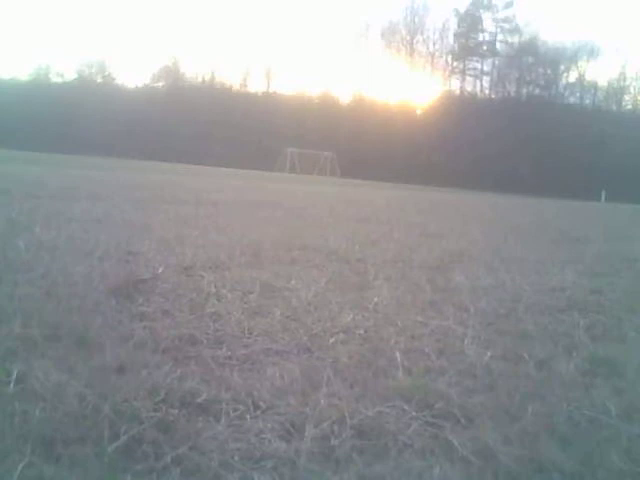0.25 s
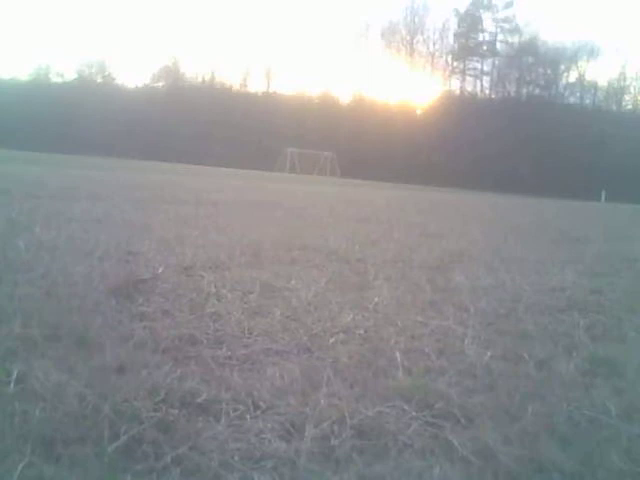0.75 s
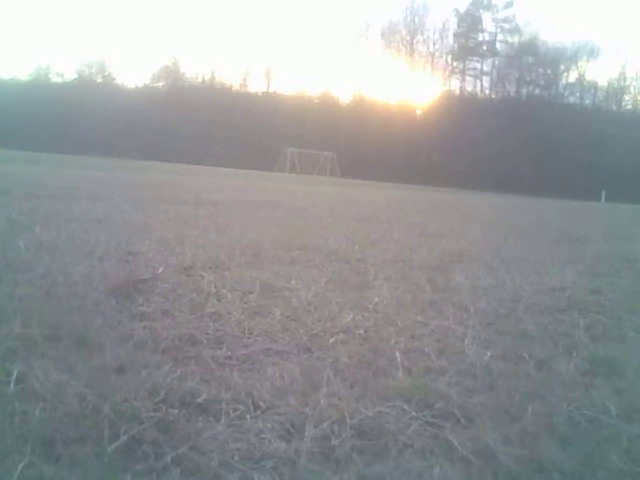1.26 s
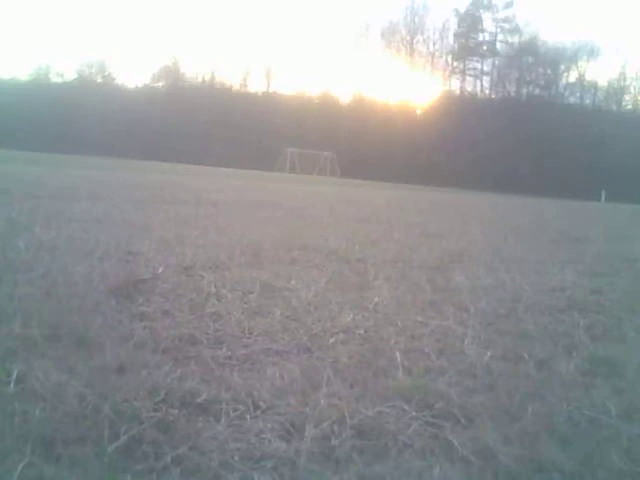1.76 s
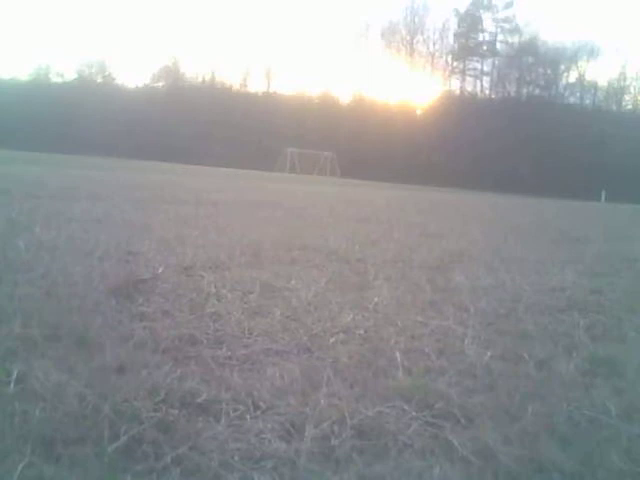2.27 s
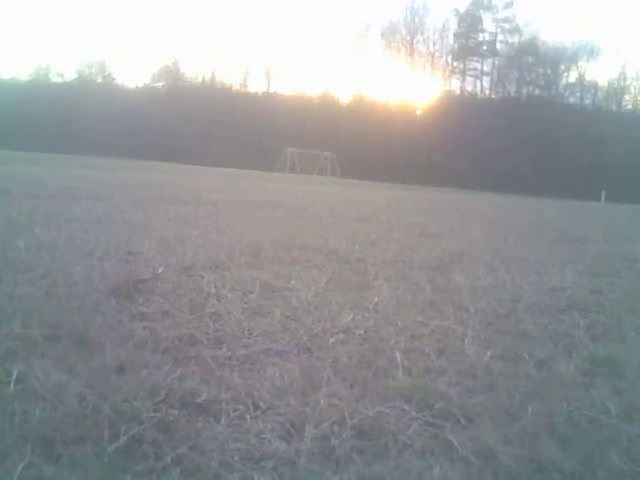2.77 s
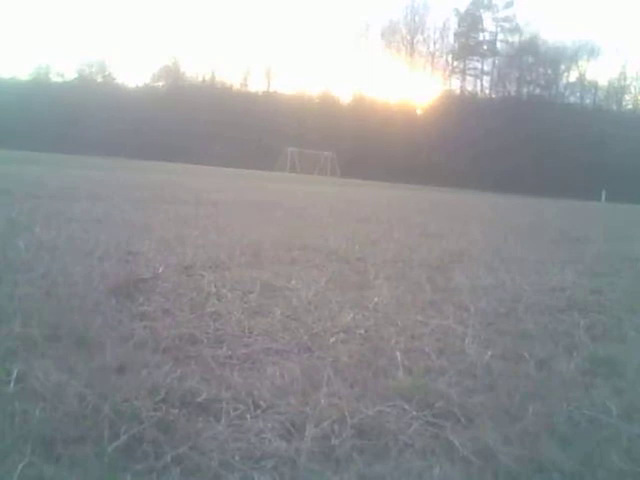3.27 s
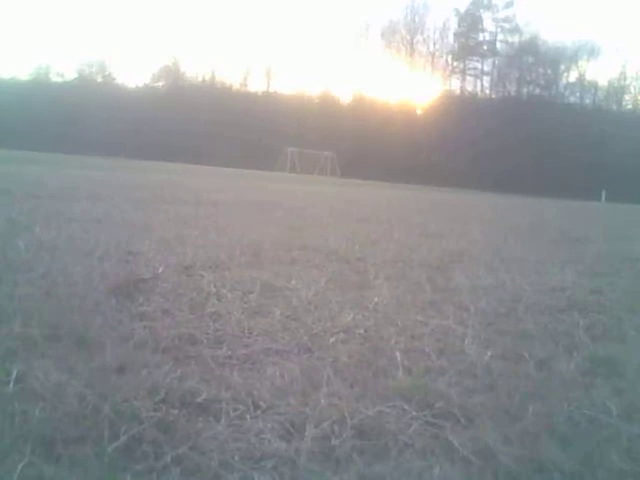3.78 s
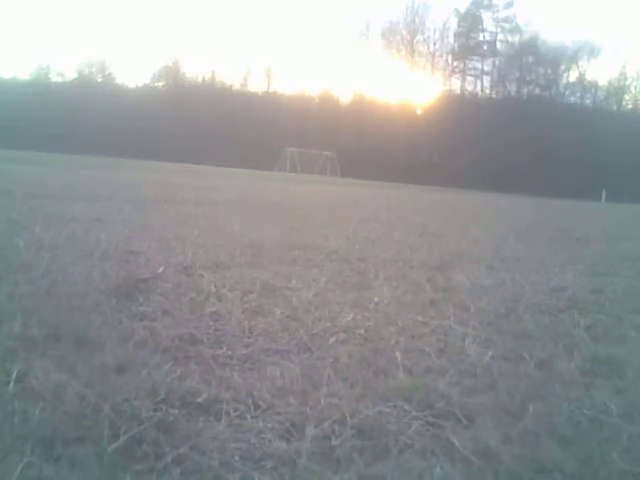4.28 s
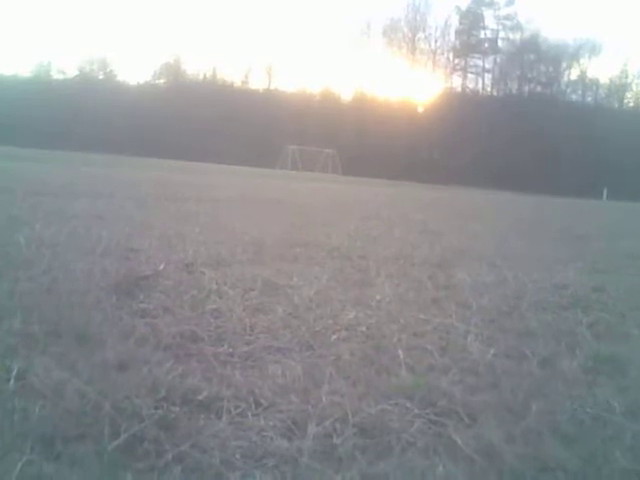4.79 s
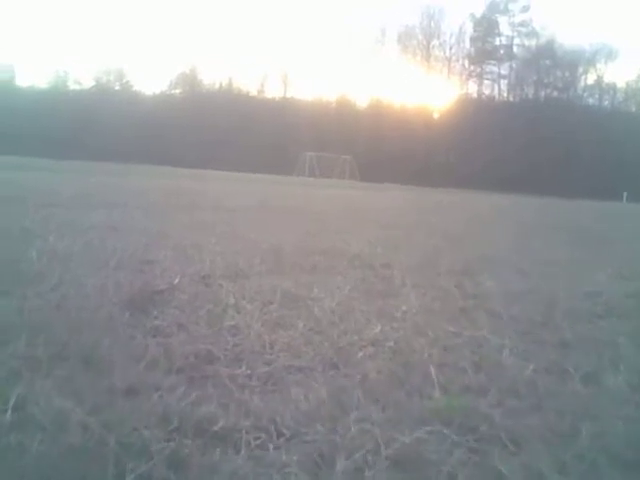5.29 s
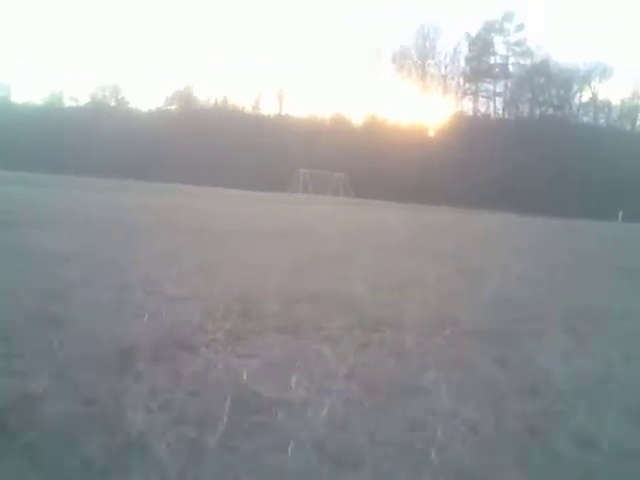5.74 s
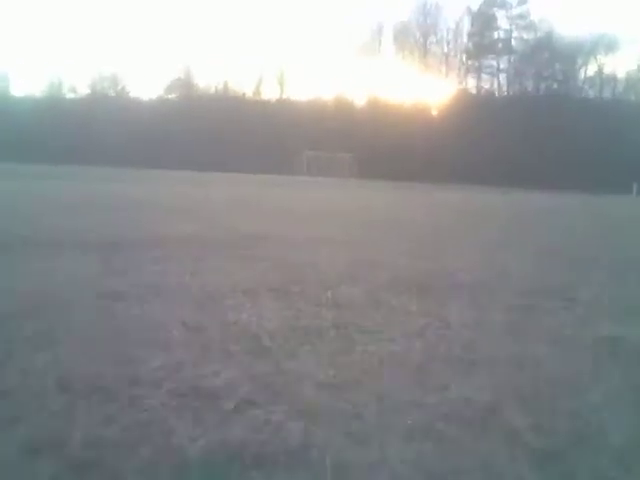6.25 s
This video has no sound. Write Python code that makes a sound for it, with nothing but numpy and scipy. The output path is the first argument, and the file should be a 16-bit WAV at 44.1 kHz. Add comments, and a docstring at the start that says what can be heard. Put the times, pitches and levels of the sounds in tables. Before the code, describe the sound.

Close on the frame of a model aircraft standing in an open grassy field, two electric motors idle quietly at slightly different speeds, beating in a low drone with fine servo ticking and brief gear rasps. After three seconds they throttle up in uneven surges, then climb to a loud, clipped, rasping roar. Wheels knock over tufts and stalks swish as it rolls until the end. No room echo.

```python
"""On the frame of a twin-motor electric model aircraft making a take-off run through grass.
Two motors idle at different speeds, heard as sum and difference tones, while servos tick and rasp.
They spool up: shaft hum, blade tone and filtered-noise air rush swell; wheel knocks ring the frame, stalks swish.
The shaking overloads the microphone, which clips it into a lopsided, rasping square wave."""
import sys
import numpy as np
from scipy import signal
from scipy.fft import rfft, irfft
from scipy.io import wavfile
from scipy.ndimage import uniform_filter1d

SR = 44100
rng = np.random.default_rng(int(sys.argv[2]) if len(sys.argv) > 2 else 0)


def dump_mix(stems):
    """Bounce the given channels to the path in sys.argv[1] as a 16-bit WAV at rate SR."""
    frames = np.atleast_2d(stems).T  # one column per channel
    limited = np.clip(frames, -1, 1)  # hard clip at full scale
    pcm = np.round(limited * 32767).astype(np.int16)
    wavfile.write(sys.argv[1], SR, pcm)


N = 287532
T = np.arange(N) / SR  # s

# lead motor: time_s, shaft_hz
SPEED_CURVE = [(3.08, 135.2), (3.16, 149.3), (3.3, 165.7), (3.5, 183.2), (3.6, 176.4), (3.77, 185.7),
               (3.92, 178.3), (4.02, 182.9), (4.2, 184), (4.4, 193.6), (4.71, 244.5), (4.86, 251.3),
               (4.98, 275.6), (5.12, 296.7), (5.26, 300.5), (5.41, 320.5), (5.5, 322), (5.6, 351.5),
               (5.95, 365.3)]
# shaft unbalance shaking the mount: shaft_hz, level_db
HUM_BY_SPEED = [(135, -55), (150, -26), (182, -24.5), (188, -6.5), (195, -1), (228, 9.5), (290, 3),
                (356, 4), (366, -10)]
# blade tone strength: shaft_hz, level_db
BLADE_BY_SPEED = [(135, -48), (143, -16.5), (160, -2.5), (215, 2.5), (238, -10.5), (272, 0), (322, -1.5),
                  (352, -4.5), (366, -26)]
# hum swells: start_s, end_s, rise_db
HUM_SWELL_EVENTS = [(3.24, 3.41, 11), (3.47, 3.6, 14), (3.77, 3.94, 14)]
# brief blade tone dips: start_s, end_s, change_db
BLADE_DIP_EVENTS = [(3.425, 3.45, -8.5), (3.565, 3.595, -18), (3.9, 3.93, -17), (4.48, 4.515, -6.5),
                    (4.595, 4.69, -30), (5.045, 5.075, -15), (5.56, 5.6, -22)]
# gusts of rough air: start_s, end_s, rise_db over the steady rush
GUST_EVENTS = [(3.175, 3.235, 14), (3.28, 3.355, 10.5), (3.425, 3.51, 11.5), (3.61, 3.79, 9.5),
               (3.95, 4.475, 10), (5.04, 5.13, 5), (5.22, 5.33, 3.5)]
# airframe response to air rush and overtones: freq_hz, gain_db
FRAME_RESPONSE = [(40, -37.5), (170, -24), (235, -3), (350, 7), (420, 5), (480, -9.5), (640, -3.5),
                  (780, -9), (900, -4.5), (1030, -15.5), (1210, -5.5), (1550, -15), (2200, -16),
                  (3200, -29.5), (6000, -37.5), (11500, -47)]
# loaded overtones, before frame colour: lead_multiple, slow_multiple, level_db
LOAD_OVERTONES = [(0, 2, -10), (3, 0, 2), (5, 0, -10)]
# idle frame tones, driven by both motors: lead_multiple, slow_multiple, level_db
IDLE_CHATTER = [(1, 0, -35.5), (0, 2, -30), (1, 1, -35.5), (2, 0, -31.5), (-1, 4, -27.5), (0, 3, -18),
                (1, 2, -38), (2, 1, -55), (3, 0, -41), (4, -1, -34), (5, -2, -58), (4, 0, -29.5),
                (5, -1, -31), (0, 5, -40), (2, 3, -67), (3, 2, -29), (4, 1, -28), (5, 0, -39),
                (0, 6, -33.5), (5, 2, -37), (6, 1, -37.5), (7, 0, -36.5), (0, 10, -41), (1, 9, -41),
                (6, 4, -32.5), (12, 0, -42.5)]
# slow motor commutation: lead_multiple, slow_multiple, level_db
COMMUTATION_WHINE = [(0, 28, -57), (0, 42, -50)]
# servo gear housing resonances: freq_hz, width_hz, relative_db
SERVO_MODES = [(930, 430, -9), (1820, 155, 7), (2284, 210, 6.5), (2700, 370, 1.5), (3760, 220, 1),
               (4120, 150, -17), (5240, 160, -7), (7200, 300, -38)]
# servo moves: start_s, end_s, level_db
SERVO_MOVES = [(0.016, 0.095, -35), (2.353, 2.41, -31), (2.473, 2.612, -33)]
# gear rasp spectrum: freq_hz, gain_db
RASP_RESPONSE = [(1500, 5.5), (3500, 4), (5000, -5.5), (7000, -7), (9200, -10), (10200, -24)]
# wheel bumps on the take-off run: time_s, level_db
ROLL_CURVE = [(4.9, -28), (5.1, -53), (5.5, -13), (5.9, -15), (6.2, -7), (6.35, -1), (6.52, -1)]
# undercarriage and frame resonances: freq_hz, width_hz, relative_db
UNDERCARRIAGE_MODES = [(136.87, 110, -9), (241.1, 144, 1.5), (590, 40, -10), (1180, 84, 4),
                       (2129, 250, -8.5)]
# hard wheel jolts: time_s, level_db
WHEEL_JOLTS = [(4.534, -10.5), (5.074, -2), (5.249, -11.5), (5.503, -0.5), (5.921, -2), (6.28, -1),
               (6.436, -13)]
# microphone response: freq_hz, gain_db
MIC_RESPONSE = [(100, -1), (1000, 0), (2500, -1), (5000, -2), (8000, -3.5), (11500, -2), (13300, -15),
                (15800, -14)]

SLOW_RATIO = 119.2 / 135  # slow shaft speed / lead shaft speed
STANDING_RUSH_DB, RUN_RUSH_RISE_DB = -15.5, 12.5
RUN_START_S, RUN_LENGTH_S = 4.97, 0.75
MIC_TOP_HZ = 15800


def undb(db):
    """Decibels to gain."""
    return 10 ** (np.asarray(db) / 20)


def unit(x):
    """Scale to standard deviation 1."""
    return x / np.std(x)


def curve(table):
    """Interpolate time_s, value rows to one value per sample."""
    return np.interp(T, *np.transpose(table))


def colour(x, response):
    """Filter by freq_hz, gain_db points, joined over log frequency."""
    hz, gain_db = np.transpose(response)
    bin_hz = np.maximum(np.fft.rfftfreq(N * 2, 1 / SR), 1)
    gain = undb(np.interp(np.log(bin_hz), np.log(hz), gain_db))
    return irfft(rfft(x, N * 2) * gain)[:N]


def ring(x, hz, width_hz):
    """One resonance, gain 1 at its centre."""
    return signal.lfilter(*signal.iirpeak(hz, hz / width_hz, fs=SR), x)


def walk(rate_hz):
    """Smooth random curve, spread 1, changing about rate_hz times a second."""
    width = max(int(SR / rate_hz), 2)
    smooth = uniform_filter1d(rng.standard_normal(N), width, mode="wrap")
    return unit(uniform_filter1d(smooth, width, mode="wrap"))


def angle(hz):
    """Running phase in radians of a frequency curve."""
    return 2 * np.pi * np.cumsum(hz) / SR


def swells(table, edge_s):
    """Sum of events in dB that rise, hold and return."""
    level_db = 0
    for start_s, end_s, change_db in table:
        inside_s = np.minimum(T - start_s, end_s - T)
        level_db = level_db + change_db * np.clip(0.5 + inside_s / edge_s, 0, 1)
    return level_db


def tones(table, lead, slow, flutter_db):
    """Sum and difference tones of two shaft phases, each fluttering on its own."""
    out = 0
    for lead_multiple, slow_multiple, level_db in table:
        phase = round(lead_multiple) * lead + round(slow_multiple) * slow + rng.uniform(0, 2 * np.pi)
        gain = undb(level_db + flutter_db * walk(16))
        out = out + gain * np.sqrt(2) * np.sin(phase)
    return out


def shaking(shaft_hz):
    """Levels in dB: hum and blade tone follow shaft speed, air rush follows the run; events add to each."""
    hum_db = np.interp(shaft_hz, *np.transpose(HUM_BY_SPEED)) + swells(HUM_SWELL_EVENTS, edge_s=0.054)
    blade_db = np.interp(shaft_hz, *np.transpose(BLADE_BY_SPEED)) + swells(BLADE_DIP_EVENTS, edge_s=0.023)
    run = np.clip((T - RUN_START_S) / RUN_LENGTH_S, 0, 1)
    rush_db = STANDING_RUSH_DB + RUN_RUSH_RISE_DB * run + swells(GUST_EVENTS, edge_s=0.064)
    return hum_db, blade_db, rush_db


def air_rush(lead, load, pulling, brighten=0.73, chop=0.16, gust_db=1.5, idle_air_db=-1):
    """Noise through the airframe, chopped once a shaft turn, brighter and gustier with shaft speed."""
    air = unit(colour(rng.standard_normal(N), FRAME_RESPONSE))
    air = unit(air + brighten * load * ring(air, 1420, 2020))
    level_db = gust_db * pulling * walk(53) + idle_air_db * (1 - pulling)
    return air * (1 + chop * np.cos(lead)) * undb(level_db)


def motors(idle_hz=135, lead_wander=0.001635, slow_wander=0.00312,
           blade_lag_rad=1.547, lag_per_load_rad=-0.94, sway_rad=0.35,
           overtone_db=-8, overtone_growth=0.2, settle_db=18):
    """Two wandering shafts shake the frame with hum, blade tone, overtones and chatter; the blades chop the air."""
    shaft_hz = curve(SPEED_CURVE)
    hum_db, blade_db, rush_db = shaking(shaft_hz)
    load = np.clip(shaft_hz / idle_hz - 1, 0, None)
    pulling = np.tanh(6 * load)  # near 0 at idle, near 1 with the throttle open
    lead = angle(shaft_hz * (1 + lead_wander * walk(8.63)))
    slow = angle(shaft_hz * SLOW_RATIO * (1 + slow_wander * walk(7.45)))

    # blade tone slips against the hum with speed, sways under load
    slip_rad = blade_lag_rad + lag_per_load_rad * load + sway_rad * pulling * walk(14.4)
    hum = np.sqrt(2) * undb(hum_db) * np.cos(lead)
    blade = np.sqrt(2) * undb(blade_db) * np.cos(2 * lead + slip_rad)
    air = undb(rush_db) * air_rush(lead, load, pulling)

    # overtones change level as they glide across frame resonances
    overtones = colour(tones(LOAD_OVERTONES, lead, slow, flutter_db=4.5), FRAME_RESPONSE)
    overtones = pulling * undb(overtone_db + overtone_growth * hum_db) * overtones
    # thrust presses loose parts together: idle chatter dies away
    chatter = undb(-settle_db * load) * tones(IDLE_CHATTER, lead, slow, flutter_db=0.2)
    whine = (1 - pulling) ** 2 * tones(COMMUTATION_WHINE, lead, slow, flutter_db=0.0)
    return hum + blade + overtones + air + chatter + whine


def servos(control_hz=45, buzz_db=-37, grit_db=3):
    """Holding servos tick at every control frame and ring the housing; moving gears rasp as gritty noise."""
    tick_at = np.arange(0, N - 1, SR / control_hz).astype(int)
    ticks = np.zeros(N)
    ticks[tick_at] = undb(rng.uniform(-1.3, 1, len(tick_at)))
    buzz = 0
    for hz, width_hz, relative_db in SERVO_MODES:
        buzz = buzz + undb(relative_db) * ring(ring(ticks, hz, width_hz), hz, 2 * width_hz)

    moving = sum(undb(db) * ((T > start_s) & (T < end_s)) for start_s, end_s, db in SERVO_MOVES)
    rasp = unit(colour(rng.standard_normal(N), RASP_RESPONSE) * undb(grit_db * walk(160)))
    return undb(buzz_db) * unit(buzz) + uniform_filter1d(moving, size=400) * rasp


def controllers(switch_hz=7590, whistle_db=-64):
    """Speed controllers switch at a fixed rate: a thin steady sine whistle."""
    return undb(whistle_db) * np.sqrt(2) * np.sin(2 * np.pi * switch_hz * T)


def wheels(knocks_per_s=400, spread_db=4, jolt_s=0.015):
    """Grass tufts knock the soft wheels and ring the frame; a jolt is a short cluster of hard knocks."""
    force = undb(curve(ROLL_CURVE)) * (T > ROLL_CURVE[0][0])
    for time_s, level_db in WHEEL_JOLTS:
        force = force + undb(level_db) * np.exp(-((T - time_s) / jolt_s) ** 2)

    size = undb(spread_db * np.minimum(rng.exponential(size=N), 3))
    size = size * np.sign(rng.standard_normal(N))
    knocks = size * (rng.random(N) < knocks_per_s / SR)
    ringing = 0
    for hz, width_hz, relative_db in UNDERCARRIAGE_MODES:
        ringing = ringing + undb(relative_db) * ring(ring(knocks, hz, width_hz), hz, 3 * width_hz)
    return force * unit(ringing)


def grass(flicks_per_s=45, decay_s=0.0035, spread_db=4, flick_db=-10, growth=0.58):
    """Stalks whip the nose: short, bright, uneven noise bursts that follow the wheel bump level."""
    size = undb(spread_db * np.minimum(rng.exponential(size=N), 2.5))
    flicks = (rng.random(N) < flicks_per_s / SR) * size
    bursts = signal.lfilter([1], [1, -np.exp(-1 / (decay_s * SR))], flicks)
    swish = unit(ring(ring(rng.standard_normal(N), 1570, 930), 1860, 2300))
    level = undb(flick_db + growth * curve(ROLL_CURVE)) * (T > RUN_START_S)
    return level * unit(bursts * swish)


def scene():
    """Sum of all sources; everything arrives through the frame, so no room."""
    return (motors() + servos() + controllers() + wheels() + grass())[None]


def overload(x, floor=0.28, ceiling=0.72, leak=0.0065, sag=0.056, fizz_db=-40):
    """Hard stop on the down swing, rounded fizzy stop on the up swing; hard drive pulls the bias down."""
    x = x - sag * uniform_filter1d(np.abs(x), size=2000)
    fine = signal.resample_poly(x, up=4, down=1)  # clip at 4x rate against aliasing
    up = np.maximum(fine, 0)
    down = np.clip(fine, -floor, 0)
    clipped = down + ceiling * np.tanh(up / ceiling) + leak * up
    out = signal.resample_poly(clipped, up=1, down=4)
    fizz = unit(ring(rng.standard_normal(N), 5200, 4000))
    return out + undb(fizz_db) * fizz * (np.maximum(out, 0) / ceiling) ** 2


def record(dry):
    """Small microphone: overload, dulled top, steep low-pass, output offset below zero."""
    offset = -0.44
    heard = colour(overload(dry[0]), MIC_RESPONSE)
    low_pass = signal.ellip(8, 0.2, 70, MIC_TOP_HZ, fs=SR, output="sos")
    return offset + signal.sosfilt(low_pass, heard)[None]


dry = scene()
out = record(dry)
dump_mix(out)
```